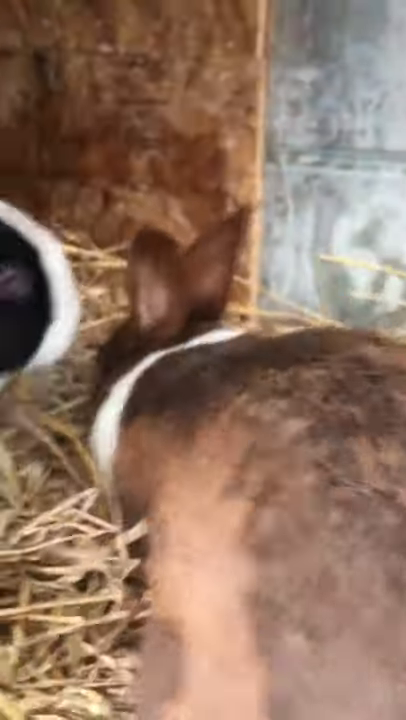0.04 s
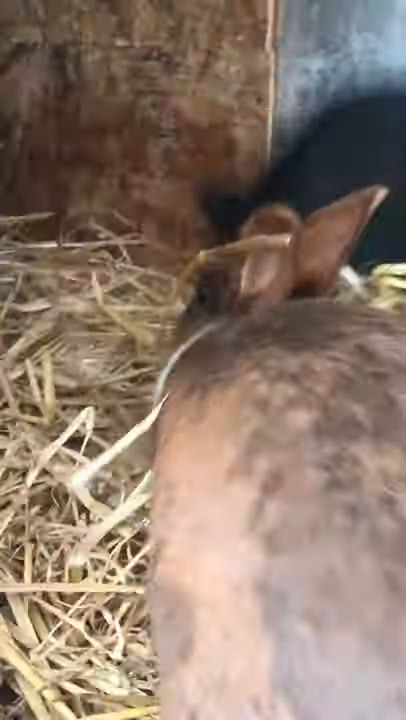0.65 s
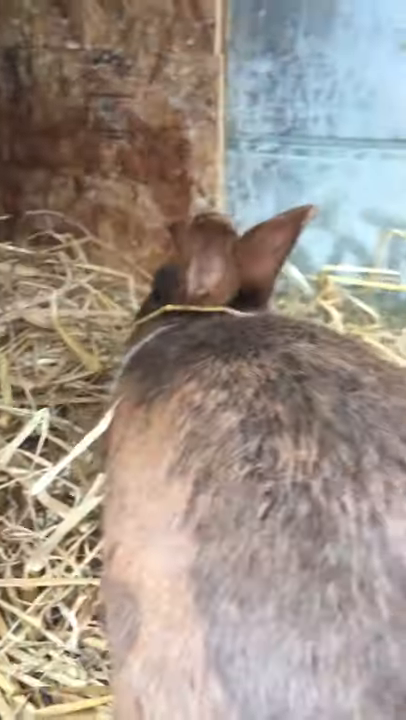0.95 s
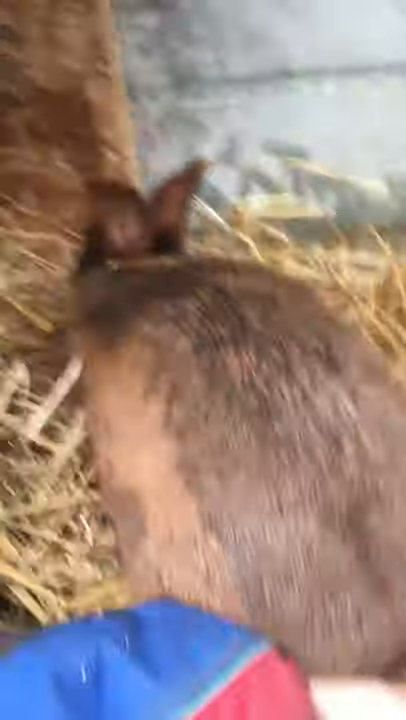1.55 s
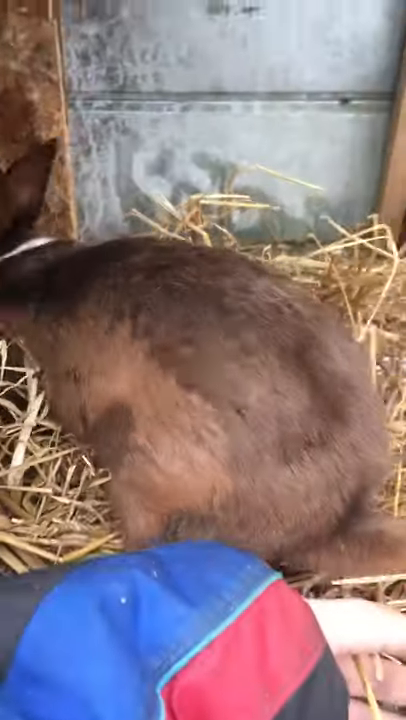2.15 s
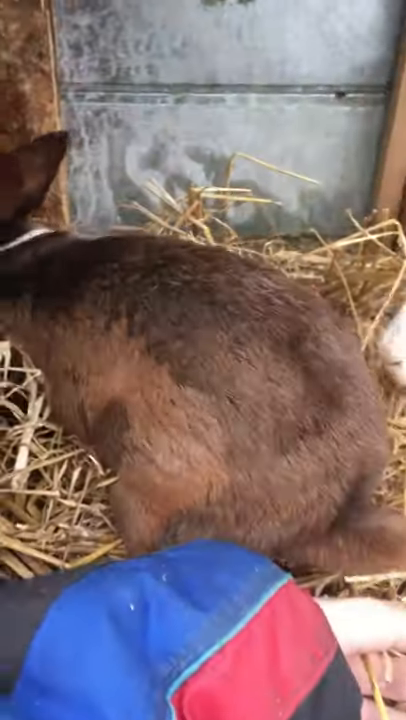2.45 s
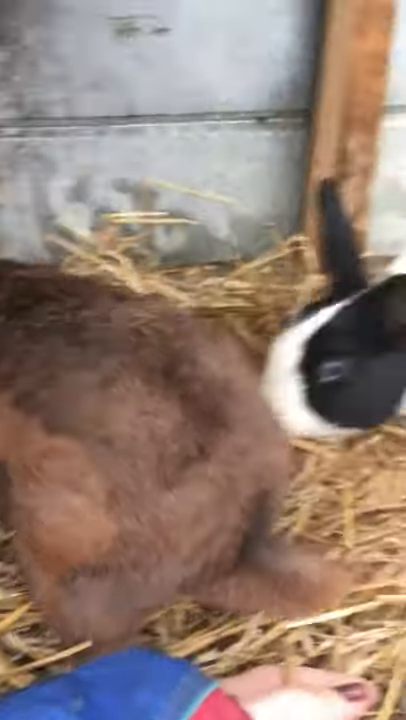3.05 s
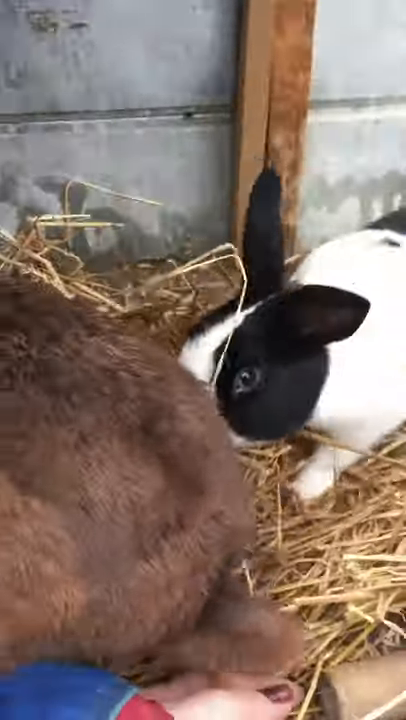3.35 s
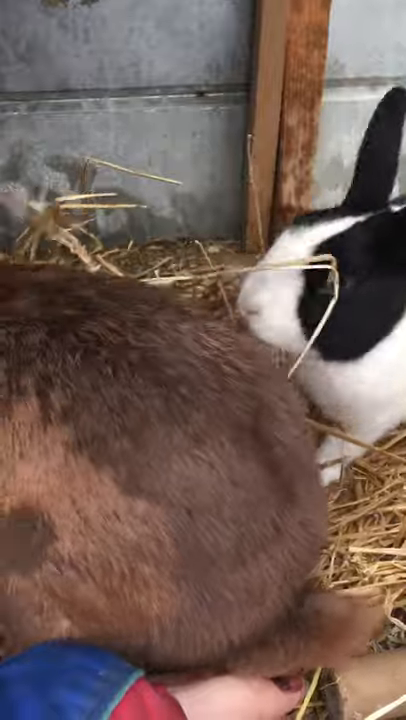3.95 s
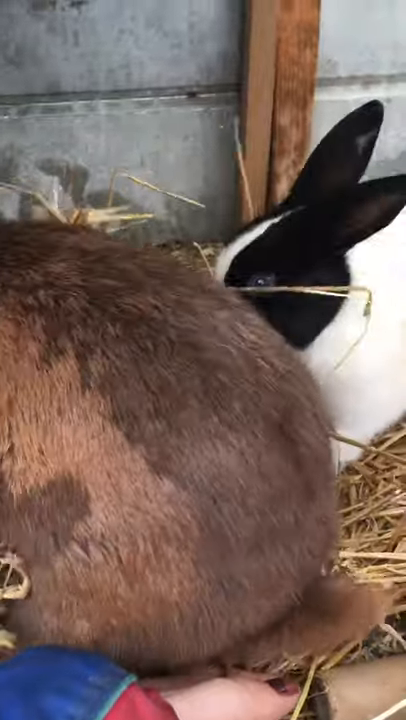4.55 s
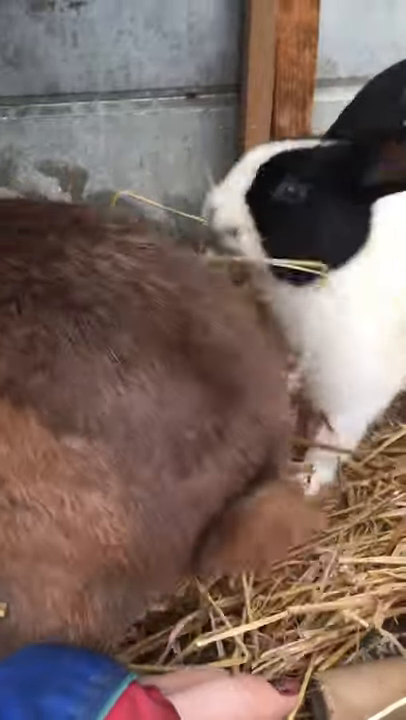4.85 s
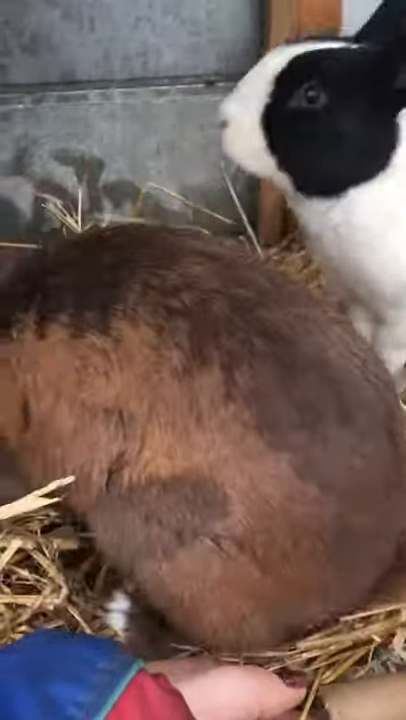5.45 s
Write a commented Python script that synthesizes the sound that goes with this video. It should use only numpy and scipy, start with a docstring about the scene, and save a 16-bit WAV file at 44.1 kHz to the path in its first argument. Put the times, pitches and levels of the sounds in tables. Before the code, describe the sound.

Dry straw rustles and crackles in close bursts as rabbits dig, with snapping stalks and soft paw thumps on wooden boards.

```python
"""Rabbits digging in straw

Two rabbits shuffle and dig in dry straw inside a wooden hutch, close to the microphone.
Countless stalks crackle in surges and single ones snap. Paws thump on the floor boards,
which creak once, and shoves of body weight make the wall boom softly. Faint outdoor air lies underneath."""
import sys
import numpy as np
from scipy import signal
from scipy.fft import rfft, irfft, next_fast_len
from scipy.io import wavfile
from scipy.ndimage import uniform_filter1d, map_coordinates

SR = 44100
rng = np.random.default_rng(int(sys.argv[2]) if len(sys.argv) > 2 else 0)


def transcribe(signal):
    """Save signal, clipped to [-1, 1], as a 16-bit WAV file at the path in sys.argv[1]."""
    frames = np.atleast_2d(signal).T
    limited = np.clip(frames, -1, 1)
    pcm = np.round(limited * 32767).astype(np.int16)
    wavfile.write(sys.argv[1], SR, pcm)


N = 250929

# Tone curves for the noise layers: (frequency [Hz], relative level [dB])
AIR_EQ = [(20, -45), (28, -19), (38, -1.5), (70, 0.5), (180, -12), (250, -12.5), (700, -31.5), (950, -24.5),
          (2000, -32), (4800, -38.5), (16000, -35)]  # outdoor bed
RUMBLE_EQ = [(25, -12), (40, -2), (95, 0), (135, 4), (175, -4.5), (270, -3.5), (300, -11), (335, -5.5),
             (420, -22), (700, -19.5), (2000, -58)]  # floor under load
CRUSH_EQ = [(150, -35), (350, -2), (500, -8), (620, -1), (800, -3), (1050, 1), (2000, -2.5), (3000, -3.5),
            (5000, -10.5), (10000, -13)]  # packed straw, dull
CRACKLE_EQ = [(500, -53), (1500, -16.5), (3200, -7), (4200, -8), (4900, -9), (6200, -2.5), (7000, -4),
              (7800, -7), (9300, 0.5), (10400, -4), (11800, 1), (15500, -2)]  # loose stalks, bright
# Body weight setting the wall panel swinging: (time [s], level [dB])
WALL_SHOVES = [(0.0, -53), (0.29, -47), (0.52, -42), (0.75, -34), (0.98, -34), (2.06, -41), (2.44, -47),
               (2.85, -42.5), (5.06, -48.5)]
# A board joint slipping under load: (time [s], slip rate [1/s], peak level [dB])
JOINT_SLIPS = [(1.09, 76, -50), (1.12, 74, -45), (1.15, 110, -51), (1.19, 115, -43), (1.22, 130, -51)]
# The same joint ticking: (time [s], peak level [dB])
JOINT_TICKS = [(1.298, -39), (1.813, -40)]
# Resonances of the floor boards: (frequency [Hz], relative level [dB], t60 [s])
BOARD_MODES = [(111, -4, 0.16), (139.3, -3, 0.25), (164.3, -2.5, 0.2), (191.5, -2.5, 0.1),
               (227, -3.5, 0.22), (276.2, -1.5, 0.14), (335.7, -5, 0.18), (402, -7, 0.17),
               (485, -13.5, 0.21)]
# Paws landing: (time [s], thump peak [dB], relative scuff level [dB], padding cut-off [Hz])
PAW_LANDINGS = [(0.338, -33.5, -44, 262), (0.515, -36.5, -23.5, 600), (0.541, -31.5, -50, 600),
                (.691, -21, -26.5, 700), (.754, -22, -34.5, 700), (.793, -26, -53, 450),
                (1.025, -37.5, -47.5, 302), (1.972, -32, -46, 252), (2.070, -34.5, -54, 350),
                (2.126, -30.5, -40, 348), (2.778, -32.5, -40.5, 500), (2.850, -32.5, -50, 280),
                (3.296, -34, -49, 600), (3.614, -32.5, -51, 119), (3.660, -40.5, -55, 120),
                (3.951, -39, -62, 120), (4.061, -38, -53, 130), (4.69, -39.5, -55, 300),
                (5.048, -33.5, -49, 280)]
# A paw, nose or body pushing through the bedding:
# (time at full force [s], hold [s], relative crackle level [dB], relative crush level [dB])
PUSHES = [(0.067, 0.027, -44.5, -53), (0.195, 0.068, -28.5, -44.5), (0.35, 0.057, -27.5, -43),
          (0.483, 0.03, -30, -43), (0.571, 0.14, -40, -48.5), (0.764, 0.032, -49.5, -53.5),
          (0.91, 0.071, -47, -57), (1.175, 0.0027, -58, -69), (1.249, 0.0055, -75, -57.5),
          (1.576, 0.065, -57, -54.5), (1.818, 0.026, -54, -58.5), (1.968, 0.0039, -40.5, -49.5),
          (2.102, 0.023, -36, -44), (2.193, 0.038, -44.5, -69), (2.408, 0.12, -49.0, -63.5),
          (2.547, 0.044, -40.5, -53.5), (2.707, 0.043, -41, -52.5), (2.859, 0.033, -43, -57.5),
          (3.021, 0.12, -45.5, -60.5), (3.248, 0.037, -36, -49), (3.349, 0.18, -41, -55),
          (3.578, 0.072, -32, -49), (3.844, 0.006, -43.5, -60), (3.987, 0.075, -30, -46),
          (4.168, 0.141, -44.5, -55.5), (4.393, 0.061, -27, -44.5), (4.496, 0.15, -33, -46.5),
          (4.72, 0.12, -41, -54.5), (4.869, 0.016, -33.0, -42), (4.98, 0.094, -31.5, -43.5),
          (5.173, 0.092, -38, -49), (5.318, 0.18, -44, -56.5), (5.675, 0.03, -29, -46.5)]
# A wad of straw giving way at once: (time [s], level [dB], t60 [s])
WAD_CRUNCHES = [(.157, -29.5, 0.32), (.748, -24, 0.036), (3.917, -32.5, 0.37), (4.595, -27, 0.44),
                (4.93, -27, 0.079), (5.43, -34, 0.11), (5.632, -32, 0.091)]
# Single stalks breaking: (time [s], dry peak level [dB], lower resonances against the top one [dB])
STALK_SNAPS = [(.0476, -23, -1), (.0522, -17, -10), (.0832, -9.5, -0.5), (.1868, -9, -2), (.3927, -8, -10),
               (.4227, -6.5, -9), (.7494, -22, 2), (1.0109, -36, -10), (1.0986, -26.5, -8),
               (1.1952, -32, -3), (1.2408, -33.5, 1), (1.9336, -23, 2), (1.9488, -15.5, -3),
               (2.3610, -30, 2), (2.4358, -22, -7), (2.4719, -6, -3.5), (2.5522, -15.5, 3),
               (2.8451, -15, -3.5), (3.0166, -32, 12), (3.5156, -18.5, 9), (3.8365, -23, 7),
               (4.9073, -14, 2), (5.0844, -10.5, -14), (5.1776, -16, 3), (5.1891, -10, -13)]


def amp(db):
    return 10 ** (np.asarray(db) / 20)


def unit_rms(x):
    return x / np.sqrt(np.mean(x ** 2) + 1e-20)


def curves(rows):
    """One value per sample for each column after the time."""
    times, *columns = np.transpose(rows)
    return [np.interp(np.arange(N) / SR, times, column) for column in columns]


def wobble(rate):
    """A smooth random curve with rate knots a second."""
    return map_coordinates(rng.standard_normal(int(N * rate / SR) + 4), [np.arange(N) * rate / SR])


def filtered(x, response):
    """Apply a gain given as a function of frequency."""
    size = next_fast_len(len(x) + SR // 2)
    return irfft(rfft(x, size) * response(np.fft.rfftfreq(size, 1 / SR)), size)[:len(x)]


def coloured(x, eq):
    """Shape x with a tone curve, at rms 1."""
    knots_hz, db = np.transpose(eq)
    return unit_rms(filtered(x, lambda hz: amp(np.interp(np.log(hz + 1), np.log(knots_hz), db))))


def ring(t, hz, t60):
    """One damped mode."""
    return np.sin(2 * np.pi * hz * t) * amp(-60 * t / t60)


def add(track, s, sound):
    """Mix a sound into the track at s seconds."""
    part = track[max(0, round(s * SR)):][:len(sound)]
    part += sound[:len(part)]


def swells(events, rise_s, t60):
    """Envelope of (time [s], level [dB]) events that rise and die away, adding in power."""
    t, power = np.arange(N) / SR, np.zeros(N)
    shape = (1 - np.exp(-t / rise_s)) * amp(-60 * t / t60)
    for s, db in events:
        add(power, s, (amp(db) * shape) ** 2)
    return np.sqrt(power)


def grains(per_s, spread_db):
    """Tiny impulses of unequal size at random moments, at rms 1."""
    size = amp(spread_db * np.clip(rng.standard_normal(N), -2, 2)) * rng.choice([-1, 1], N)
    return unit_rms((rng.random(N) < per_s / SR) * size)


def bursts(per_s, spread_db, t60):
    """Envelope of random fractures of unequal size that hit at once and die away, at rms 1."""
    chance = np.clip(per_s / SR, 1e-5, 1)
    hits = rng.random(N) < chance
    size = amp(spread_db * np.clip(rng.standard_normal(N), -2, 2))
    decay = amp(-60 / (t60 * SR))
    power = signal.lfilter([1], [1, -decay ** 2], hits / chance * size ** 2)
    return unit_rms(np.sqrt(power))


def outdoor_air():
    """A faint, steady bed of low noise."""
    return amp(-51.5) * coloured(rng.standard_normal(N), AIR_EQ)


def wall_boom():
    """Each shove swings the wall panel in its lowest mode, which wavers and dies away slowly."""
    panel_hz = 62.5
    phase = 2 * np.pi * panel_hz * np.arange(N) / SR + 0.31 * wobble(9.8)
    swing = swells(WALL_SHOVES, rise_s=0.01, t60=1.73) * amp(0.54 * wobble(12))
    return unit_rms(np.sin(phase)) * swing


def floor_rumble(crush_db):
    """The floor rumbles under every push and while the weight settles after a landing."""
    rest_db, push_db, settle_db = -56, -5.5, -12
    soft_hz = 300  # padding softer than this also cushions the settling
    landings = [(s, db + 20 * np.log10(min(padding_hz / soft_hz, 1)))
                for s, db, _, padding_hz in PAW_LANDINGS]
    settling = amp(settle_db) * swells(landings, rise_s=0.012, t60=0.76)
    load = np.sqrt(amp(rest_db) ** 2 + amp(crush_db + push_db) ** 2 + settling ** 2)
    return coloured(grains(per_s=400, spread_db=2), RUMBLE_EQ) * load


def joint_creak():
    """A joint sticks and slips, speeding up, then ticks; every slip rings the same two wood modes."""
    out, t = np.zeros(N), np.arange(SR // 40) / SR
    rate, level_db = curves(JOINT_SLIPS)
    slip_count = np.floor(np.cumsum(rate * np.exp(0.15 * wobble(60))) / SR)
    slips = np.flatnonzero(np.diff(slip_count)) / SR
    slips = slips[(slips > JOINT_SLIPS[0][0]) & (slips < JOINT_SLIPS[-1][0])]
    knock = (ring(t, 860, 0.012) + amp(4) * ring(t, 610, 0.0066)) * (1 - np.exp(-t / 0.0008))
    for s, db in [(s, level_db[int(s * SR)]) for s in slips] + list(JOINT_TICKS):
        add(out, s, amp(db) * knock / np.abs(knock).max())
    return out


def paw_thumps():
    """Each landing rings the boards and scuffs the straw; thick padding mutes the higher modes."""
    out, t = np.zeros(N), np.arange(SR // 2) / SR
    hz, mode_db, t60 = np.transpose(BOARD_MODES)[:, :, None]
    thump_attack = 1 - np.exp(-t / 0.003)
    scuff_envelope = amp(-60 * t / 0.12) * (1 - np.exp(-t / 0.0011))
    for s, thump_db, scuff_db, padding_hz in PAW_LANDINGS:
        spot = rng.standard_normal(hz.shape)  # where the paw lands favours some modes
        padding = (1 + (hz / padding_hz) ** 2) ** -1.5
        strength = amp(mode_db + 2.7 * spot) * np.sign(spot) * padding
        thump = np.sum(strength * ring(t, hz * (1 + 0.014 * spot), t60), axis=0) * thump_attack
        scuff = coloured(rng.standard_normal(len(t)), CRUSH_EQ) * scuff_envelope
        add(out, s, amp(thump_db) * thump / np.abs(thump).max() + amp(scuff_db - 2.5) * scuff)
    return out


def digging_effort():
    """Crackle and crush envelopes in dB: pushes build, hold and let go, adding in power."""
    attack_db_per_s, release_db_per_s = 175.5, 180.5
    t, power = np.arange(N) / SR, np.zeros((2, N))
    for s, hold, *levels in PUSHES:
        attack_db = -attack_db_per_s * np.maximum(s - t, 0)
        release_db = -release_db_per_s * np.maximum(t - s - hold, 0)
        power += np.outer(amp(levels), amp(attack_db + release_db)) ** 2
    uneven_db = 1.5 * wobble(25)  # the straw catches and yields
    return 10 * np.log10(power + 1e-12) + uneven_db


def colour_drift(x, depth_db):
    """Different stalks rub from moment to moment, so the colour drifts."""
    spectrum = signal.stft(x, nperseg=256)[2]
    drift = uniform_filter1d(rng.standard_normal(spectrum.shape), size=9, axis=0)  # smooth in frequency
    drift = unit_rms(uniform_filter1d(drift, size=16, axis=1))  # and in time
    return unit_rms(signal.istft(spectrum * amp(depth_db * drift), nperseg=256)[1][:N])


def straw_rustle(crackle_db, crush_db):
    """Stalks rub and crack in clumps, louder and denser when pushed harder, over a dull crush below."""
    density = amp(0.6 * (crackle_db + 35))
    cracks = bursts(1800 * density, spread_db=2, t60=0.0012)  # single fibres giving way
    slides = bursts(260 * density, spread_db=0.5, t60=0.093)  # whole stalks slipping past each other
    rubbing = 0.54  # steady share of the friction
    stir = unit_rms(np.sqrt((0.44 * cracks) ** 2 + (0.75 * slides) ** 2 + rubbing ** 2))
    wads, t = np.zeros(N), np.arange(SR // 3) / SR
    for s, db, t60 in WAD_CRUNCHES:
        add(wads, s, amp(db - 60 * t / t60))
    crackle = colour_drift(coloured(stir * rng.standard_normal(N), CRACKLE_EQ), depth_db=1.52)
    crush = colour_drift(coloured(stir * rng.standard_normal(N), CRUSH_EQ), depth_db=3)
    crackle_gain = np.hypot(amp(crackle_db + 0.94), wads)
    crush_gain = np.hypot(amp(crush_db + 0.4), amp(-15) * wads)
    return crackle * crackle_gain + crush * crush_gain


def hutch_reverb(x, wet_db, t60):
    """The close walls scatter each sound into a very short tail."""
    t = np.arange(SR // 8) / SR
    out = x.copy()
    for start in range(0, N, len(t)):  # the paths change as the animals move
        tail = rng.standard_normal(len(t)) * amp(-60 * t / t60)
        wet = signal.fftconvolve(x[start:start + len(t)], tail / np.linalg.norm(tail))
        add(out, start / SR, amp(wet_db) * wet)
    return out


def stalk_snaps(crackle_db):
    """A breaking stalk clicks in three broad resonances, with a slap off the nearest wall."""
    out, t = np.zeros(N), np.arange(SR // 200) / SR
    attack = (1 - np.exp(-t / 0.000068)) ** 2  # the fibres part one after another
    # Stray snaps fall at random and ride on the crackle level.
    stray_per_s, above_crackle_db, spread_db = 6.4, 15, 4
    moments = np.flatnonzero(rng.random(N) < stray_per_s / SR)
    stray_db = crackle_db + above_crackle_db + spread_db * rng.standard_normal(N)
    breaks = list(STALK_SNAPS) + [(i / SR, stray_db[i], 0) for i in moments]
    for s, db, body_db in breaks:
        top_tune, body_tune, wall_path = 1 + rng.uniform(-0.92, 1, 3) * [0.04, 0.08, 0.3]
        body = ring(t, 7200 * body_tune, 0.0007) + amp(-20.5) * ring(t, 3200 * body_tune, 0.0012)
        click = attack * (ring(t, 14200 * top_tune, 0.00095) + amp(body_db) * body)
        click *= amp(db) / np.abs(click).max()
        add(out, s, click)
        add(out, s + 0.0018 * wall_path, amp(-12) * click)
    return hutch_reverb(out, wet_db=-3.5, t60=0.033)


def scene():
    """Mono mix; one digging effort drives the rustle, the floor rumble and the stray snaps."""
    crackle_db, crush_db = digging_effort()
    rustle = straw_rustle(crackle_db, crush_db)
    low_end = paw_thumps() + floor_rumble(crush_db) + wall_boom()
    return (rustle + low_end + outdoor_air() + joint_creak() + stalk_snaps(crackle_db))[None]


def record(dry):
    """The microphone rolls off the deepest bass and keeps nothing above its band limit."""
    bass_hz, top_hz = 36, 16000

    def response(hz):
        low_cut = hz ** 4 / np.hypot(hz ** 4, bass_hz ** 4)
        high_cut = np.clip((top_hz - hz) / 200 + 0.5, 0, 1)
        return low_cut * high_cut
    return np.array([filtered(x, response) for x in dry])


dry = scene()
out = record(dry)
transcribe(out)
```